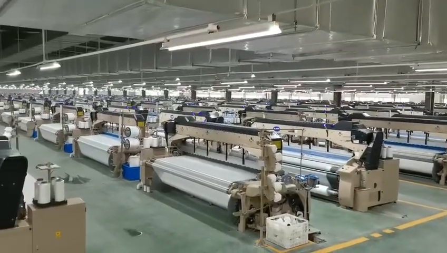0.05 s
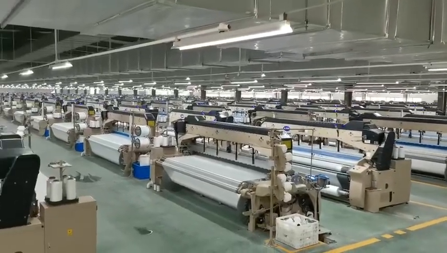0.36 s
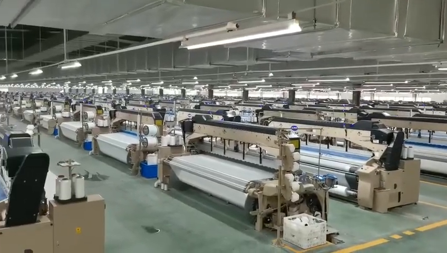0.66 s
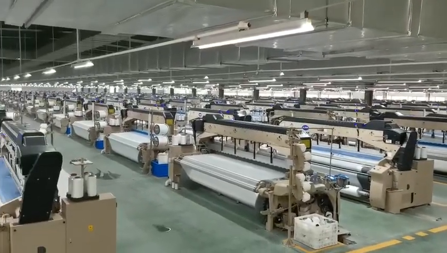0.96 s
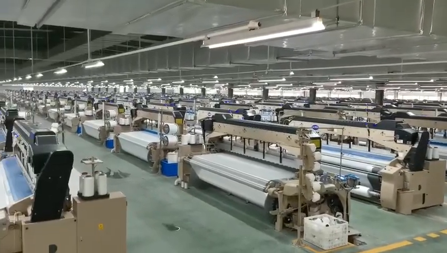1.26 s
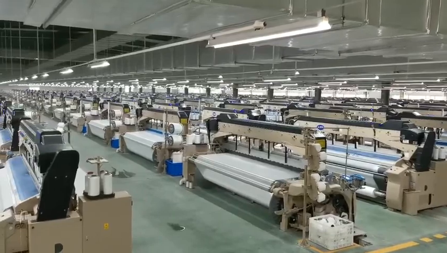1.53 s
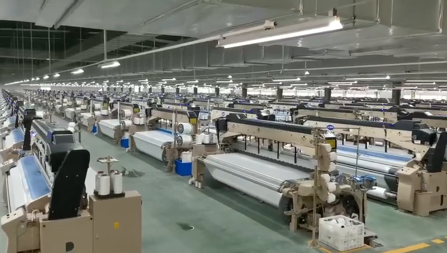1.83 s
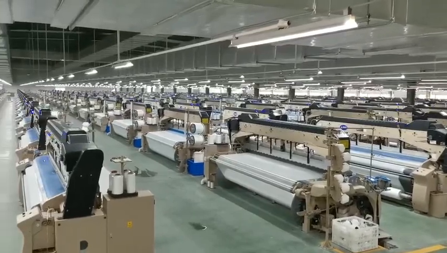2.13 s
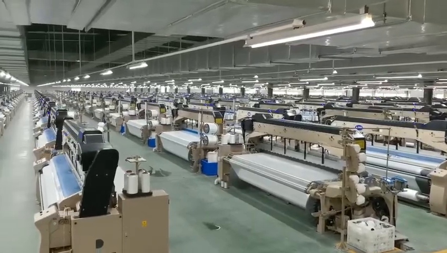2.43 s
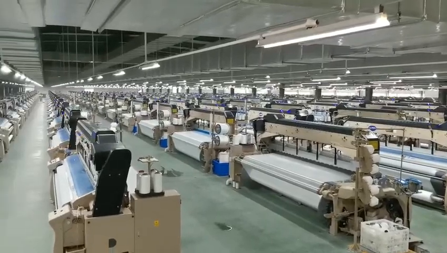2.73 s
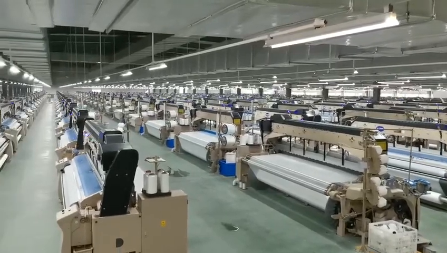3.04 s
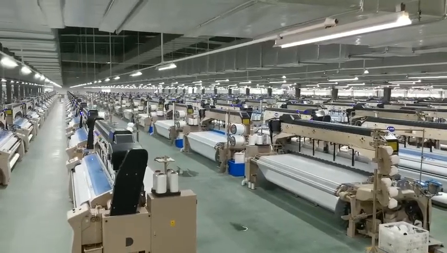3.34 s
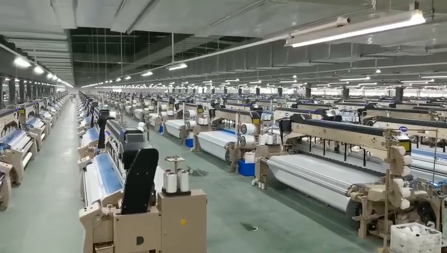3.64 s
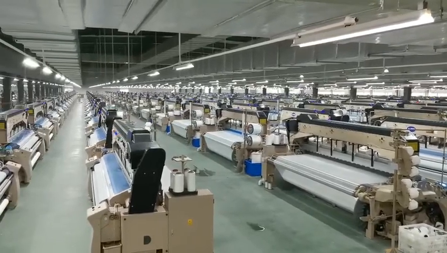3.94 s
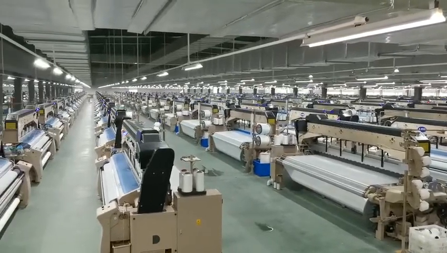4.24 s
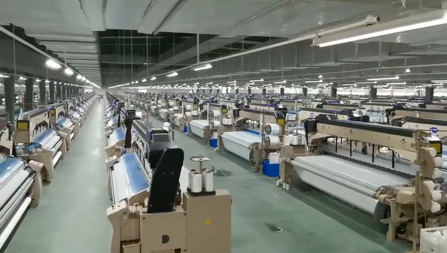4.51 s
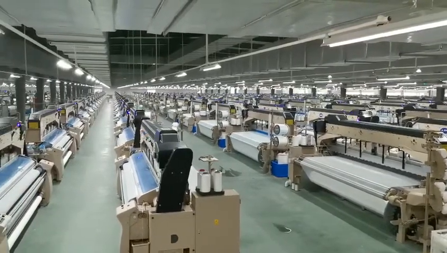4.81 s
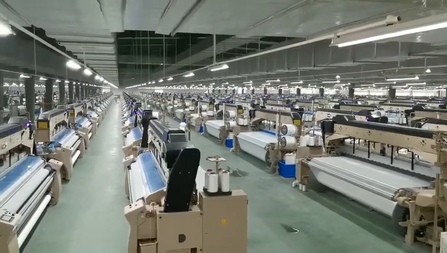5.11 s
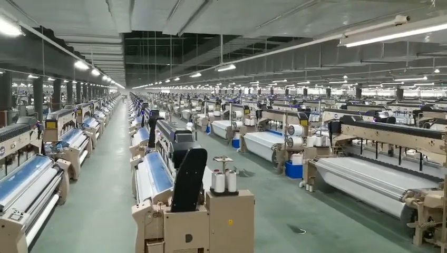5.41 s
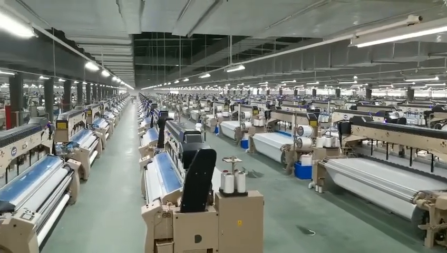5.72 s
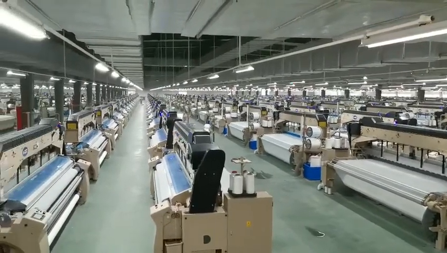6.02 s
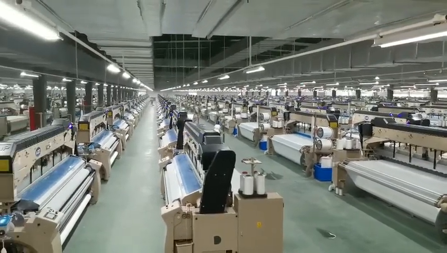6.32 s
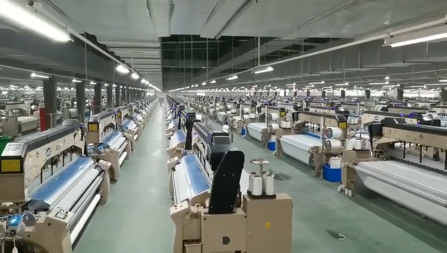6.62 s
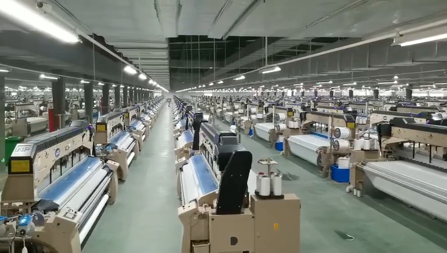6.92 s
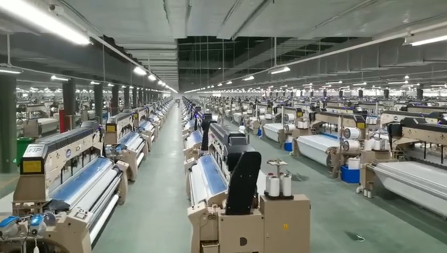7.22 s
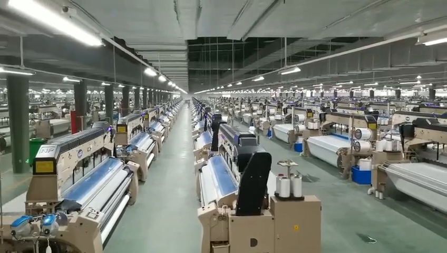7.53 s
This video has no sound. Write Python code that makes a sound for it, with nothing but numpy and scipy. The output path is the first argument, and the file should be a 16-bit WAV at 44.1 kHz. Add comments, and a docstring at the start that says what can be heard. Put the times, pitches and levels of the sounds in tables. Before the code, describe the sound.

From the first moment to the end, at about 8 seconds, many looms run together in a large, reverberant factory hall, heard in wide stereo from among the machines. The nearest loom beats evenly about seven and a half times a second, with a low thump and a faint ringing of its covers. A second, quieter loom knocks slightly slower, and the distant ones blur into a dense, continuous clatter. A steady hiss of air jets lies over this roar. Throughout, the motors hold a high whine on almost one pitch, swelling irregularly several times a second, now on the left, now on the right. Its faint upper overtones glint briefly at around 3.9 and 5 seconds. The low rumble rises and falls only slightly, with small lifts near 0.5, 5.6 and 6.2 seconds. Nothing starts or stops, and the overall level stays nearly constant.

```python
"""A large weaving hall, full of air-jet looms running at about seven and a half picks a second.
The nearest loom thumps in a steady beat as its reed rocks the frame and its covers ring; the others
merge into a reverberant clatter under the hiss of their weft jets. The motor drives whine at almost
one pitch: they beat, and swell now at one ear, now at the other, as we move along the aisle."""
import sys
import numpy as np
from scipy import signal
from scipy.fft import rfft, irfft
from scipy.io import wavfile
from scipy.ndimage import uniform_filter1d

SR = 44100
rng = np.random.default_rng(int(sys.argv[2]) if len(sys.argv) > 2 else 0)


def materialize(psi):
    """Save the field psi as 16-bit PCM at rate SR to the path in sys.argv[1].

    A 1-D psi becomes a single channel; in a 2-D psi each row is a channel.
    """
    bounded = np.clip(np.atleast_2d(psi).T, -1, 1)
    quanta = np.round(bounded * 32767).astype(np.int16)
    wavfile.write(sys.argv[1], SR, quanta)


N = 342216

# Speeds of the two near looms in picks per second, the nearest first.
NEAR_PICK_RATES = [7.517, 7.013]
# Stereo width of the hall, rippled by the microphone spacing.
# Each row: frequency in Hz, left-right likeness (1 is mono, below 0 out of phase).
EAR_LIKENESS = [(60, 0.95), (160, 1), (270, 0.96), (450, 0.87), (600, 0.75), (880, 0.56), (1100, 0.47),
                (1370, 0.16), (1600, -0.28), (1800, -0.53), (2100, -0.013), (2420, 0.066), (2720, -0.093),
                (3100, -0.21), (3550, -0.29), (4350, 0.46), (4950, -0.29), (5500, 0.014), (15000, -0.14)]
# Lean of the stereo image. Each row: frequency in Hz, left over right in dB.
EAR_BALANCE = [(100, -2.1), (450, -1), (750, -2.5), (1200, -2.5), (2000, -1), (2450, 4.5), (3150, -5),
               (3900, 0.7), (4900, 0), (5500, 4), (6900, -2.5), (8300, 4), (9200, 12), (10200, 2.5),
               (12500, 2.5), (14000, 6)]
EARS = np.array([[1], [-1]])   # left, right
FIRST_BEAT_S = 0.004
HANDOVER_HZ = 2050   # the clatter lies below, the jets above


def from_db(db):
    """Turn decibels into gain."""
    return 10 ** (np.asarray(db) / 20)


def unit_power(x):
    """Scale a signal to a mean power of 1."""
    return x / np.sqrt(np.mean(x ** 2) + 1e-20)


def fader(points):
    """A level ride: straight lines between points in time."""
    return np.interp(np.arange(N) / SR, *np.transpose(points))


def at_hz(points, hz):
    """Read a curve on a log-frequency axis."""
    known_hz, values = np.transpose(points)
    return np.interp(np.log(hz + 1), np.log(known_hz), values)


def drift(rate_hz):
    """A random wobble of unit power, mostly slower than rate_hz."""
    hz = np.fft.rfftfreq(N, 1 / SR)
    return unit_power(irfft(rfft(rng.standard_normal(N)) / (1 + (hz / rate_hz) ** 2), N))


def resonate(x, hz, width_hz):
    """One resonance with a gain of 1 at its peak."""
    r = np.exp(-np.pi * width_hz / SR)
    feedback = [1, -2 * r * np.cos(2 * np.pi * hz / SR), r * r]
    return signal.lfilter(np.array([1, 0, -1]) * (1 - r * r) / 2, feedback, x + 1e-18)


def steep_resonance(x, hz, width_hz):
    """Two resonances in series, each twice the nominal width, for steeper skirts."""
    return resonate(resonate(x, hz, 2 * width_hz), hz, 2 * width_hz)


def diffuse(pair, spectrum, crossover):
    """Colour two unrelated signals and spread them like the hall: narrow bass, wide treble."""
    hz = np.fft.rfftfreq(N, 1 / SR)
    mid, side = rfft(unit_power(pair)) * from_db(at_hz(spectrum, hz)) * np.sqrt(SR / 2) * crossover(hz)
    alike = at_hz(EAR_LIKENESS, hz)
    stereo = np.sqrt((1 + alike) / 2) * mid + EARS * np.sqrt((1 - alike) / 2) * side
    lean = from_db(EARS * at_hz(EAR_BALANCE, hz) / 2)
    lean = lean / np.sqrt(np.mean(lean ** 2, axis=0))
    return irfft(lean * stereo, N)


def swell_shape(start_s, length_s, skirt_s=0.011, sharpness=0.68):
    """One lobe of a beat: a round top between steep flanks that reach skirt_s past each end."""
    from_top = (np.arange(N) / SR - (start_s + length_s / 2)) / (length_s / 2 + skirt_s)
    inside = np.abs(from_top) < 1
    shape = np.zeros(N)
    shape[inside] = np.cos(np.pi / 2 * from_top[inside]) ** sharpness
    return shape


def low_end_ride(x, depth=0.83, corner_hz=500):
    """The low end rises and falls slightly and irregularly over time."""
    # Each row: time in seconds, level in dB before it is centred and scaled by depth.
    low_end_levels = [(0, -3.5), (.35, -4), (.55, -1.5), (.75, -4.5), (1.7, -3), (2.6, -3.5), (4.3, -3.5),
                      (5.1, -3.5), (5.65, -2), (6, -4.5), (6.2, -1), (6.5, -2), (7.76, -3.5)]
    ride_db = fader(low_end_levels)
    low = signal.sosfiltfilt(signal.butter(2, corner_hz, fs=SR, output="sos"), x)
    return x + low * (from_db(depth * (ride_db - ride_db.mean())) - 1)


def weft_jets(pick_db=0.2, cycle_db=0.16, flutter_db=0.5, treble_wobble_db=1.45, treble_hz=7000):
    """Air rushes from all the nozzles, pulsing faintly once a pick, harder on every other one."""
    # Colour of the rushing air. Each row: frequency in Hz, level in dB per Hz.
    air_spectrum = [(2050, -54.5), (2300, -50.5), (2440, -50), (2600, -57.5), (2750, -58), (3100, -64),
                    (3650, -69), (4000, -69), (4400, -66), (4750, -66.5), (4870, -64.5), (5100, -66.5),
                    (5450, -68.5), (5700, -72), (6200, -74.5), (6850, -76), (7200, -77), (8200, -81),
                    (9200, -79), (10000, -81.5), (10800, -80.5), (12500, -87), (14500, -102)]
    pick_phase = 2 * np.pi * NEAR_PICK_RATES[0] * np.arange(N) / SR
    puffs_db = pick_db * np.cos(pick_phase) + cycle_db * np.cos(pick_phase / 2) + flutter_db * drift(5.2)
    rush = rng.standard_normal((2, N)) * from_db(puffs_db)
    # a fast random level wobble on the treble above 7 kHz
    treble = signal.sosfiltfilt(signal.butter(2, treble_hz, "high", fs=SR, output="sos"), rush)
    rush = rush + treble * (from_db(treble_wobble_db * drift(30)) - 1)
    return diffuse(rush, air_spectrum, lambda hz: np.sqrt(1 - 1 / (1 + (hz / HANDOVER_HZ) ** 40)))


def far_drives(wander_hz=0.8):
    """Distant motor tones wander a little and beat against each other."""
    # Each row: pitch of a drive in Hz, level in dB against the loudest.
    motor_tones = [(2178.6, -20), (2195.4, -15), (2201.6, -4), (2203.7, 0), (2205.6, -4), (2210.0, -3)]
    out = 0
    for hz, db in motor_tones:
        cycles = np.cumsum(hz + wander_hz * drift(1.43)) / SR + rng.random()
        out = out + from_db(db) * np.sin(2 * np.pi * cycles)
    return out


def drive_overtones(drive_hz=2205.6, steady_db=-46, glint_db=1.0):
    """The drives' upper partials smear into narrow bands that glint at each ear and sometimes flare."""
    # Each row: multiple of the drive pitch, nominal width in Hz, relative level in dB.
    partials = [(2, 7, 0.9), (3, 20, -15), (4, 25, -17.5)]
    # Brief flares on top of the steady level. Each row: start in seconds, length in seconds, gain in dB.
    flare_cues = [(1.96, .035, -47), (3.88, 0.053, -37), (5.043, 0.054, -42)]
    flares = sum(from_db(db) * swell_shape(start_s, length_s) for start_s, length_s, db in flare_cues)
    bands = 0
    for multiple, width_hz, db in partials:
        band = steep_resonance(rng.standard_normal((2, N + SR)), multiple * drive_hz, width_hz)[:, SR:]
        envelope = np.sqrt(uniform_filter1d(band ** 2, int(.03 * SR), axis=-1) + 1e-6)
        bands = bands + from_db(db) * band / envelope   # levelled: only the fastest beats remain
    glint = from_db(glint_db * np.array([drift(8), drift(8.6)]))
    return bands * (from_db(steady_db) + flares) * glint


def drive_whine(pitch_hz=2203.3, wander_hz=1.18, rest_db=-31.5, lift_db=0.2, flutter_db=1.5, far_db=-41):
    """The near drives sing on and swell where they fall in step; the far ones beat underneath."""
    # Each row: start in seconds, length in seconds, level in dB before lift_db,
    # left over right in dB, phase lead of the left ear in degrees.
    swell_cues = [(0.038, 0.14, -19.5, 0, -150), (0.227, 0.12, -18.5, -4, -170),
                  (0.368, 0.14, -24, -6, 180), (0.498, 0.082, -20.5, 3, 80), (0.653, 0.041, -23, 5, -180),
                  (0.689, 0.06, -24.5, 2, -20), (0.772, 0.09, -21.5, -13, 180), (0.814, 0.11, -20.5, 5, 90),
                  (0.89, 0.15, -23, 6, -140), (1.007, 0.056, -22, -6, 100), (1.07, 0.13, -21, -3, -160),
                  (1.18, 0.065, -19, 0, -180), (1.283, 0.04, -26, -15, 80), (1.352, 0.092, -17.5, 7, -140),
                  (1.462, 0.14, -17.5, 1, 10), (1.577, 0.095, -18.5, -16, 110),
                  (1.679, 0.061, -19, -20, -180), (1.755, 0.089, -21.5, 0, -42),
                  (1.865, 0.07, -20.5, -1, 110), (1.932, 0.1, -18.5, -2, 60), (2.032, 0.11, -19.5, 5, 110),
                  (2.154, 0.066, -23, 8, 120), (2.214, 0.11, -20.0, -2, -150),
                  (2.323, 0.027, -21.5, 1, -40), (2.357, 0.12, -20.5, 6, -10),
                  (2.443, 0.125, -20.5, 21, 180), (2.5, 0.15, -20.5, -2.5, 20),
                  (2.648, 0.068, -23.0, 5, 170), (2.72, 0.075, -17.5, -7.5, 180),
                  (2.835, 0.14, -23.5, -11, -120), (2.933, 0.15, -19, 1, 10),
                  (3.038, 0.106, -19, -18, -100), (3.153, 0.11, -20.5, 9, -40),
                  (3.234, 0.074, -21.0, -6, -140), (3.354, 0.11, -19, -9, -80), (3.455, 0.047, -18, 14, 80),
                  (3.494, 0.11, -21.5, -3, -30), (3.646, 0.07, -21, -10, -140),
                  (3.742, 0.067, -17.5, 11, 130), (3.855, 0.058, -20, -11.5, -180),
                  (3.968, 0.092, -22, -12, 20), (4.053, 0.058, -21.0, 6, -40),
                  (4.122, 0.13, -17.5, -20, -180), (4.202, 0.09, -19, 6, -110),
                  (4.266, 0.13, -20.5, 6, 158), (4.388, 0.084, -20.5, 10, -120),
                  (4.489, 0.11, -20, 10, -110), (4.59, 0.12, -25.0, 6, 180), (4.658, 0.13, -19.5, -5, 60),
                  (4.772, 0.103, -16.5, -2, 155), (4.903, 0.035, -21.0, -1, 20),
                  (4.957, 0.096, -19.0, 7, -170), (5.054, 0.056, -22, -6, -30), (5.104, 0.087, -21, 4, 140),
                  (5.168, 0.12, -23.5, -11, -80), (5.24, 0.13, -19, -9, 130), (5.408, 0.061, -21, 3, 20),
                  (5.486, 0.093, -25, 3, 60), (5.555, 0.071, -24, 2, -80), (5.71, 0.075, -20.5, 18, 180),
                  (5.75, 0.11, -17.5, -8, 104), (5.834, 0.13, -20, 11, -50), (5.955, 0.14, -20.5, 18, 90),
                  (6.045, 0.13, -23, -1, 140), (6.18, 0.068, -24.5, 18, 50), (6.252, 0.078, -21.0, -3, 60),
                  (6.333, 0.097, -19.0, -2, 136), (6.425, 0.073, -18, -8, -180), (6.543, 0.06, -19, 3, 10),
                  (6.6, 0.07, -23.5, 0, 50), (6.66, 0.118, -21.0, 18, -110), (6.775, 0.053, -22, 2, -44),
                  (6.865, 0.031, -22.5, 17, 180), (6.874, 0.12, -16.5, -5, 130), (6.978, 0.14, -22, 6, 80),
                  (7.12, 0.022, -29, 17, -180), (7.171, 0.14, -25.0, 0, 110), (7.3, 0.058, -19, 17, 180),
                  (7.438, 0.064, -23, 22, -130), (7.493, 0.097, -20, -5, -180),
                  (7.541, 0.13, -21.5, 12, -70), (7.658, 0.14, -21.5, -9, -80)]
    beats = np.array([drift(7) + 1j * drift(7) for ear in EARS])   # restless bed between the swells
    phasor = from_db(rest_db) * beats / np.sqrt(1 + np.abs(beats) ** 2 / 2)
    power = np.abs(phasor) ** 2
    # swells add in power and hand their phase on to the next
    for start_s, length_s, db, pan_db, lead_deg in swell_cues:
        lobe = swell_shape(start_s, length_s)
        at = np.flatnonzero(lobe)
        swell = lobe[at] * from_db(db + lift_db) * unit_power(from_db(EARS * pan_db / 2))
        power[:, at] += swell ** 2
        phasor[:, at] += swell * np.exp(1j * EARS * np.radians(lead_deg) / 2)
    gain = uniform_filter1d(np.sqrt(power) * np.exp(1j * np.angle(phasor)), int(.016 * SR), axis=1)
    tone = np.sqrt(2) * np.exp(2j * np.pi * np.cumsum(pitch_hz + wander_hz * drift(4.1)) / SR)
    flutter = from_db(flutter_db * np.array([drift(16) for ear in EARS]))
    far = unit_power(np.array([far_drives() for ear in EARS]))
    return np.real(gain * flutter * tone) + from_db(far_db) * far


def blows(rate_hz, first_s, jitter_s, uneven_db=0.0):
    """Evenly timed impacts with a little play, and one second of pre-roll."""
    times_s = first_s + np.arange(-int(rate_hz) - 2, int(rate_hz * N / SR) + 1) / rate_hz + 1
    timing, force = rng.standard_normal((len(times_s), 2)).T
    at = np.round((times_s + jitter_s * timing) * SR).astype(int)
    inside = (at >= 0) & (at < N + SR)
    train = np.zeros(N + SR)
    train[at[inside]] = from_db(uneven_db * force[inside])
    return train


def loom(pick_rate, first_s, direct, weave_picks=6, rattle_s=0.0048, hall_t60_s=2.94, heald_gain=0.88):
    """Each beat-up rattles the loom and fills the hall; each pick of the weave lifts its own healds."""
    t = np.arange(SR) / SR
    decay = from_db(-60 * t / hall_t60_s) + direct * np.exp(-t / rattle_s)
    reed = rng.standard_normal((2, SR))
    out = 0
    for pick in range(weave_picks):
        knock = decay * (reed + heald_gain * rng.standard_normal((2, SR)))
        train = blows(pick_rate / weave_picks, first_s + pick / pick_rate, jitter_s=0.00016)
        out = out + signal.fftconvolve(train[None], knock, axes=1)[:, SR:SR + N]
    return unit_power(out)


def loom_clatter(far_looms=5, far_db=-7.0, wash_db=-4.3):
    """Two near looms knock over far ones at speeds of their own and the noise wash of the farthest."""
    # Mix levels of the two near looms in dB, the nearest first.
    near_levels = [-4.3, -12.0]
    # Speed range of the far looms: slowest and fastest, in picks per second.
    far_rate_range = (6.6, 8.4)
    # Colour of the reeds and heald frames. Each row: frequency in Hz, level in dB per Hz.
    clatter_spectrum = [(20, -73), (35, -78), (50, -60.5), (100, -58.5), (140, -51), (200, -47), (280, -44),
                        (350, -44.5), (430, -49.5), (600, -52.5), (1080, -54.5), (1450, -54), (1900, -52),
                        (2050, -51.5)]
    near = far = 0
    for k, (rate, db) in enumerate(zip(NEAR_PICK_RATES, near_levels)):
        first_s = FIRST_BEAT_S + k / rate / 2   # the second loom comes in on its off-beat
        near = near + from_db(db) * loom(rate, first_s, direct=0.48)
    for rate in rng.uniform(*far_rate_range, far_looms):
        far = far + loom(rate, rng.random() / rate, direct=1.0, weave_picks=2)
    hall = near + from_db(far_db) * unit_power(far) + from_db(wash_db) * rng.standard_normal((2, N))
    return diffuse(hall, clatter_spectrum, lambda hz: 1 / np.sqrt(1 + (hz / HANDOVER_HZ) ** 40))


def ringing_covers():
    """Covers and beams of the nearest loom ring under its blows; the higher ones sound wider."""
    # Each row: pitch of a resonance in Hz, width in Hz, level in dB before the rise and fall.
    cover_modes = [(267.6, 14, -37.5), (343, 47, -34.5), (483, 27, -39.5), (613, 45, -41),
                   (1192, 47, -33.5)]
    # Slow, irregular rise and fall in the ringing's level. Each row: time in seconds, gain in dB.
    rise_and_fall = [(0, -5), (.75, 0.5), (2, -5), (2.8, -2.5), (3.8, -0.5), (4.6, -5.5), (5.6, 0.5),
                     (6.2, -4), (7, -1.5), (7.6, 1)]
    mid, side = loom(NEAR_PICK_RATES[0], FIRST_BEAT_S, direct=0.3)
    out = 0
    for hz, width_hz, db in cover_modes:
        alike = at_hz(EAR_LIKENESS, hz)
        shaking = np.sqrt(1 + alike) * mid + EARS * np.sqrt(1 - alike) * side
        gain = from_db(db + EARS * at_hz(EAR_BALANCE, hz) / 2)
        out = out + gain * unit_power(resonate(shaking, hz, width_hz))
    return out * from_db(fader(rise_and_fall))


def frame_thump(lean_db=-0.5):
    """The reed of the nearest loom rocks its frame once a pick, a touch right of centre."""
    # Each row: pitch of the rocking frame in Hz, nominal width in Hz, level in dB.
    frame_modes = [(75.0, 6.0, -40.6)]
    train = blows(NEAR_PICK_RATES[0], FIRST_BEAT_S, jitter_s=0.00017, uneven_db=0.5)
    rocking = sum(from_db(db) * unit_power(steep_resonance(train, hz, width_hz)[SR:])
                  for hz, width_hz, db in frame_modes)
    return rocking * from_db(EARS * lean_db)


def scene():
    """Looms, jets and drives all run together in the hall."""
    looms = low_end_ride(loom_clatter() + ringing_covers()) + frame_thump()
    return looms + weft_jets() + drive_whine() + drive_overtones()


def record(dry):
    """A steep low-pass takes off the very top, 40 dB down at 15.6 kHz."""
    return signal.sosfilt(signal.cheby2(16, 40, 15600, fs=SR, output="sos"), dry)


dry = scene()
out = record(dry)
materialize(out)
```